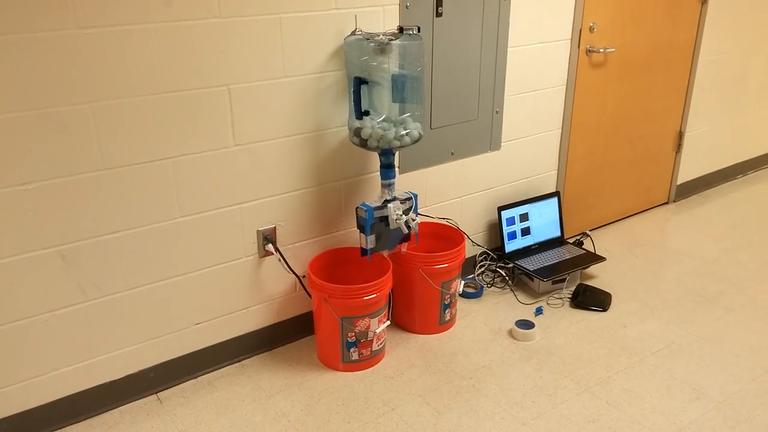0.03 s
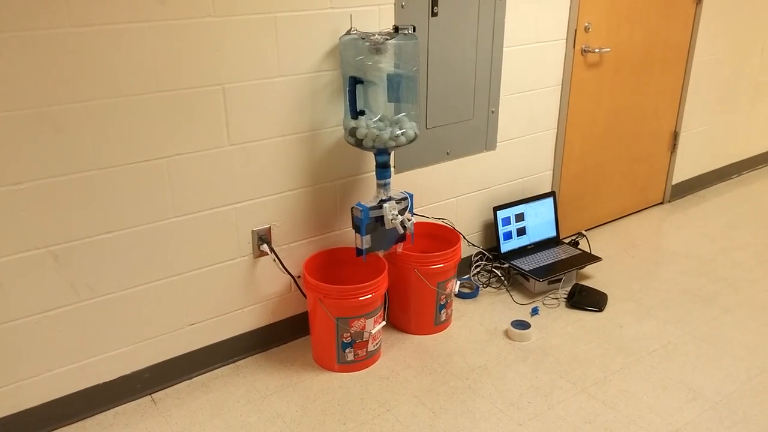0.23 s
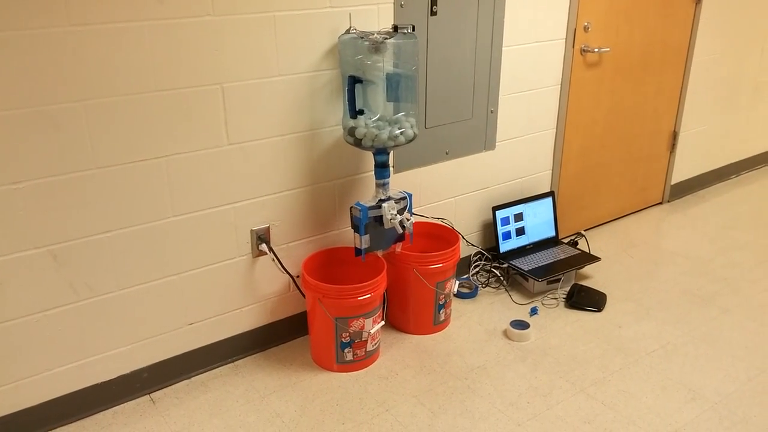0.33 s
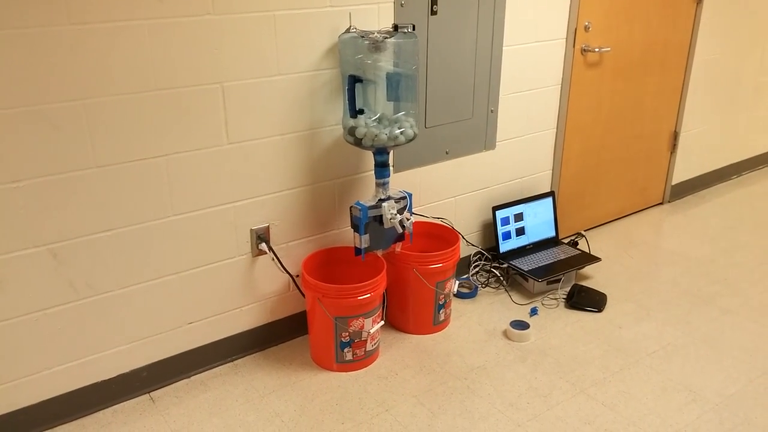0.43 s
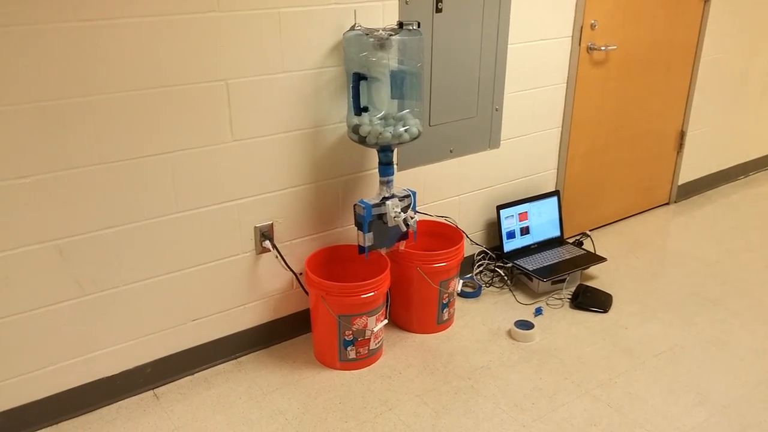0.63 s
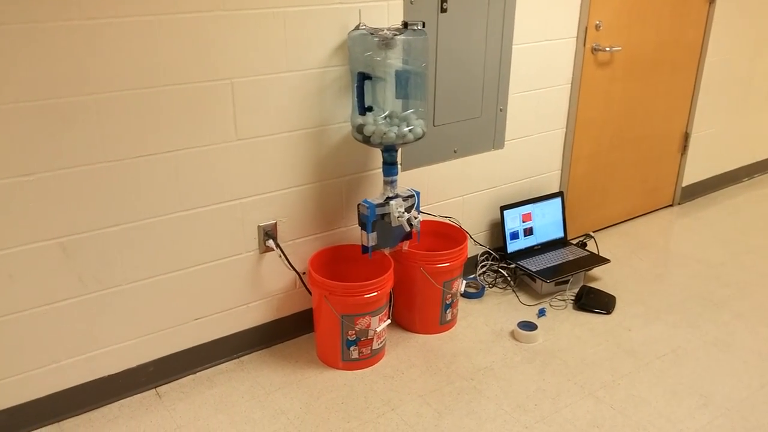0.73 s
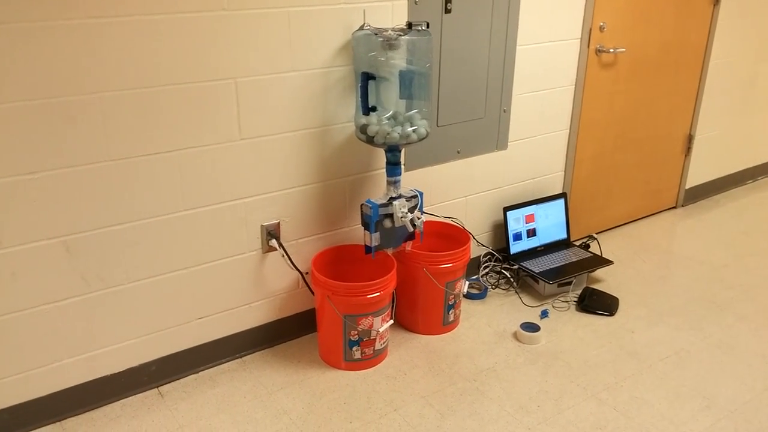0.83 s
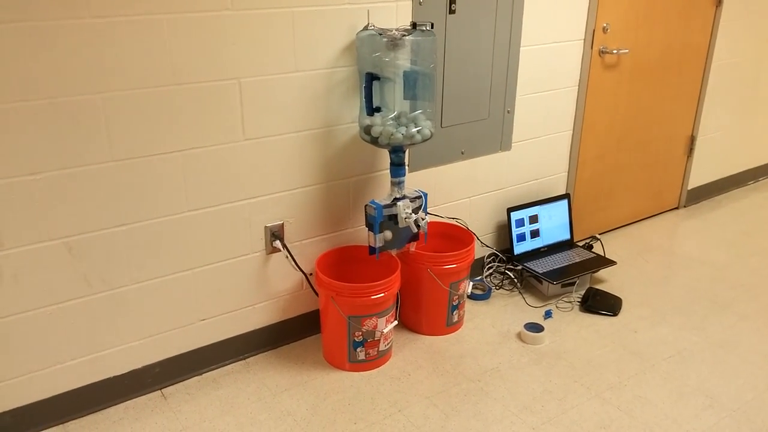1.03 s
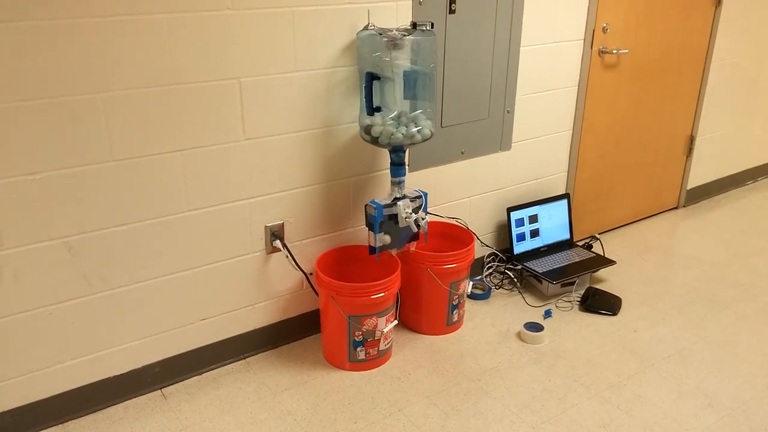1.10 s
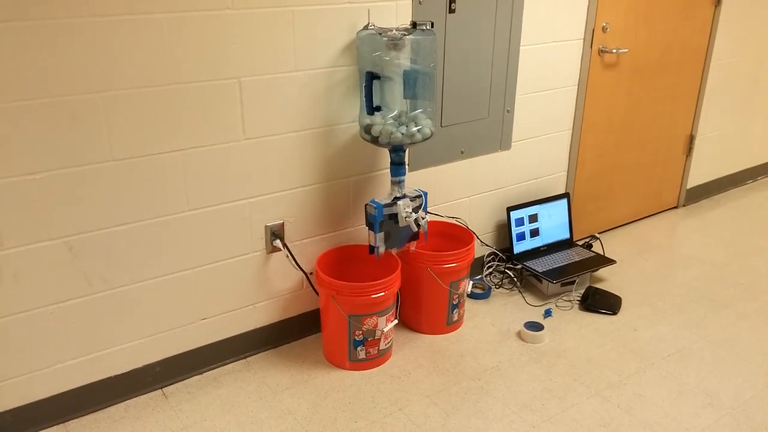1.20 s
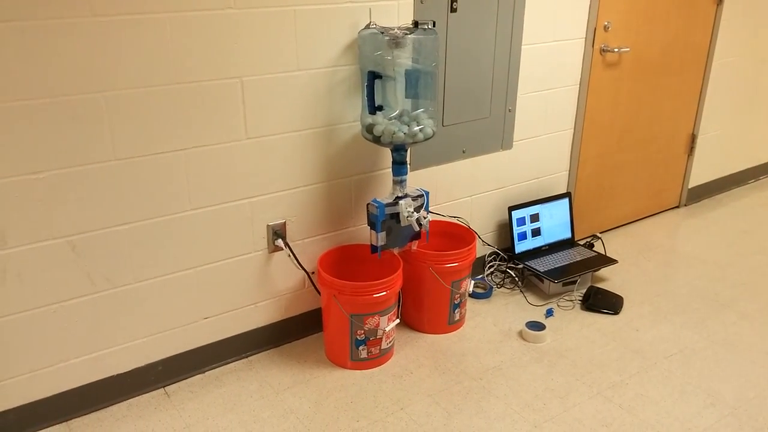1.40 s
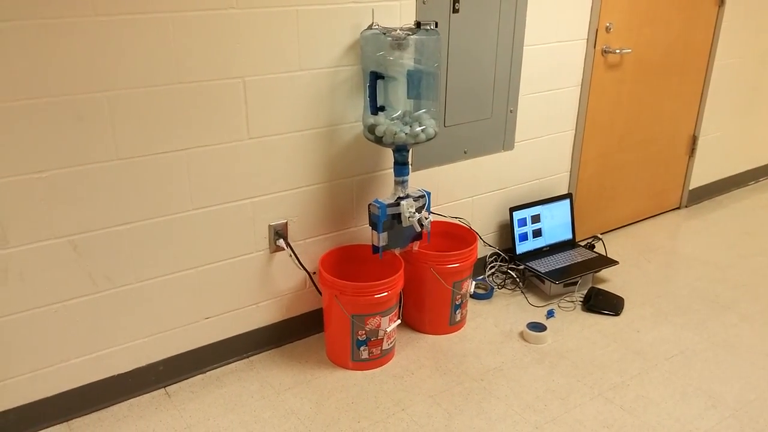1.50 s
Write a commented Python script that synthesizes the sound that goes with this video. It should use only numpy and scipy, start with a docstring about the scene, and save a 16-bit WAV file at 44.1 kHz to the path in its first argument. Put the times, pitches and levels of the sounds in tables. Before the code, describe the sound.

A ball knocks into a plastic bucket and rattles around, over low room noise.

```python
"""Low room noise, rumble and a thin hiss fill a hard-walled corridor. Soft bumps set the air in a
plastic bucket booming, with a brief scuff. A ball drops in with a sharp knock and makes the bucket
ring with uneven, fading bounces. Rubbing gives a short falling squeak, and a few weaker knocks,
bumps and scuffs follow. The background sinks away, then the room noise returns with a last bump."""
import sys
import numpy as np
from scipy import signal
from scipy.fft import rfft, irfft, next_fast_len
from scipy.io import wavfile
from scipy.ndimage import map_coordinates

SR = 44100
rng = np.random.default_rng(int(sys.argv[2]) if len(sys.argv) > 2 else 0)


def waveform_to_disk(signal):
    """Save audio, clipped to [-1, 1], as 16-bit WAV at the path in sys.argv[1]."""
    frames = np.transpose(np.atleast_2d(signal))
    scaled = np.clip(frames, -1, 1) * 32767
    samples = np.round(scaled).astype(np.int16)
    wavfile.write(sys.argv[1], SR, samples)


N = 68355

# how alike left and right sound: frequency_hz, likeness (1 = the same)
STEREO_LIKENESS = [(100, .955), (260, .94), (500, .8), (1000, .33), (2000, .35), (4000, 0), (15000, 0)]
# tone colour of rubbing: frequency_hz, level_db
RUB_SPECTRUM = [(300, -30), (700, 1), (950, 7), (1300, -2.5), (1800, -3.5), (2300, -9.5), (2800, -10),
                (3500, -15), (4250, -6), (5000, -14), (7000, -14.5), (11000, -14.5), (16000, -31)]


def amp(db):
    """Turn decibels into a number to multiply by."""
    return 10 ** (np.asarray(db) / 20)


def unit(x):
    """Scale a sound to an average (rms) level of 1."""
    return x / np.sqrt(np.mean(x ** 2) + 1e-20)


def along(points, hz):
    """Read a table of (frequency_hz, value) between its rows, on a log frequency scale."""
    frequencies, values = np.transpose(points)
    return np.interp(np.log(hz + 1), np.log(frequencies + 1), values)


def curves(rows):
    """Join the rows of a timed table with straight lines: one curve for each column after the time."""
    times, *columns = np.transpose(rows)
    return [np.interp(np.arange(N) / SR, times, column) for column in columns]


def since(start_s):
    """Seconds after a moment, zero before it."""
    return np.maximum(np.arange(N) / SR - start_s, 0)


def strike(t, rise_s, fade_s):
    """The loudness of a hit: a quick rise, and a fall of 60 dB every fade_s."""
    return (1 - np.exp(-t / rise_s)) * np.exp(-np.log(1000) * t / fade_s)


def filtered(x, response):
    """Turn each frequency up or down by response(hz)."""
    size = next_fast_len(N + SR // 10, True)
    return irfft(rfft(x, size) * response(np.fft.rfftfreq(size, 1 / SR)), size)[..., :N]


def stereo_angle(hz):
    """An angle that grows as left and right become less alike."""
    return np.arccos(np.clip(along(STEREO_LIKENESS, hz), -1, 1)) / 2


def noise(spectrum=None):
    """Stereo noise of level 1 with a given tone colour, alike on both sides in the bass."""
    def response(hz):
        angle = stereo_angle(hz)
        colour = amp(along(spectrum, hz)) if spectrum else 1
        return np.array([np.cos(angle), np.sin(angle)]) * colour
    mid, side = filtered(rng.standard_normal((2, N)), response)
    return unit(np.array([mid + side, mid - side]))


def ring(tones, t, rise_s):
    """A struck thing's fading tones, new at every hit; high ones reach left and right out of step."""
    out = np.zeros((2, N))
    t = t[t > 0]
    for pitch_hz, level_db, fade_s in tones:
        phase = 2 * np.pi * (pitch_hz * t + rng.random())
        skew = rng.choice([-1, 1]) * stereo_angle(pitch_hz)
        gain = amp(level_db + rng.normal())  # varies by about 1 dB
        out[:, N - len(t):] += gain * strike(t, rise_s, fade_s) * np.sin([phase + skew, phase - skew])
    return out


def echo(x):
    """The corridor's walls throw a sound back, each frequency dying away at its own speed."""
    # how long the echo lasts: frequency_hz, fade_s (raised to at least 0.01 below)
    fade_times = [(100, .8), (260, 1), (700, 0.49), (1800, 0.48), (5000, 1), (13000, -0.8)]
    # tone colour of the echo: frequency_hz, level_db
    colour = [(100, -2), (260, -5.5), (600, -2), (1000, -2), (2000, -4), (5000, -6), (12000, -7)]
    hz, t, bands = signal.stft(noise(), SR, nperseg=256)
    fade_s = np.maximum(along(fade_times, hz), .01)[:, None]
    same_energy = np.sqrt(2 * np.log(1000) / (fade_s * SR))  # for long and short fades alike
    gain = amp(along(colour, hz))[:, None] * same_energy
    fading = bands * gain * strike(t, rise_s=0.004, fade_s=fade_s)
    tail = signal.istft(fading, SR, nperseg=256)[1][:, :SR]
    return signal.fftconvolve(x, tail, axes=1)[:, :N]


def background():
    """Room noise, building rumble and a thin hiss, each swelling and sinking on its own."""
    # tone colour of each noise: frequency_hz, level_db
    room_spectrum = [(20, -43), (75, -29), (120, -33), (185, 3), (350, -3), (600, -5), (950, 0.5),
                     (1300, -10.5), (2000, -12.5), (3200, -33.5), (5000, -42.5), (16000, -31)]
    rumble_spectrum = [(20, -41), (45, -14.5), (62, -10), (77, 5.5), (90, -9.5), (120, -6.5), (250, -21.5),
                       (1000, -70)]
    hiss_spectrum = [(2000, 5.5), (5000, 2), (7000, 5.5), (9300, 10.5), (12000, 6), (15500, 0.5)]
    # loudness of each noise: time_s, level_db
    room_level = [(0, -38.5), (.2, -38), (.45, -29.5), (.8, -33), (1, -39), (1.12, -42.5), (1.33, -43),
                  (1.43, -48), (1.48, -51.5), (1.51, -38.5), (1.55, -34.5)]
    rumble_level = [(0, -63), (.13, -55.5), (.3, -46), (.6, -45), (.92, -45.5), (1.05, -56), (1.2, -42),
                    (1.33, -51), (1.47, -55), (1.53, -40)]
    hiss_level = [(0, -46), (.12, -46), (.23, -45.5), (.4, -42.5), (.55, -43), (.75, -45), (.87, -47.5),
                  (1.02, -45), (1.13, -48.5), (1.25, -52.5), (1.39, -56.5), (1.48, -65), (1.495, -57.5),
                  (1.55, -71)]
    layers = [(room_level, room_spectrum), (rumble_level, rumble_spectrum), (hiss_level, hiss_spectrum)]
    return sum(amp(curves(level)[0]) * noise(spectrum) for level, spectrum in layers)


def bumps():
    """Each soft bump makes a dull tap, then the air in the bucket swells into a boom."""
    # soft bumps on the bucket: start_s, tap_db, boom_db
    hits = [(0.037, -27.5, -29.5), (.084, -31.5, -32.5), (0.129, -28.5, -34), (0.668, -35, -27),
            (.728, -25, -34.5), (.832, -47, -27.5), (1.173, -23, -22), (1.488, -28.5, -25)]
    # tone colour of a tap: frequency_hz, level_db
    tap_spectrum = [(60, -20), (300, 4), (600, 6), (950, 10), (1300, -2), (1900, -1.5), (3000, -17.5),
                    (5500, -23), (10000, -29.5), (16000, -41)]
    # tones of the air in the bucket: pitch_hz, level_db, fade_s
    air_tones = [(172.4, -2, 0.21), (188, 0.5, 0.22)]
    boom_delay_s = 0.01312
    out, tap = np.zeros((2, N)), noise(tap_spectrum)
    for start_s, tap_db, boom_db in hits:
        out += amp(tap_db) * tap * strike(since(start_s), rise_s=0.003, fade_s=0.15)
        out += amp(boom_db) * ring(air_tones, since(start_s + boom_delay_s), rise_s=0.006)
    return out + echo(out)


def scuffs():
    """Brief rubs make short swells of noise with no tone."""
    # the rubs: peak_s, half_length_s, level_db
    rubs = [(0.122, 0.021, -40), (1.227, 0.041, -37), (1.54, 0.025, -46)]
    swells = sum(amp(level_db) * np.exp(-((since(0) - peak_s) / half_length_s) ** 2)
                 for peak_s, half_length_s, level_db in rubs)
    out = noise(RUB_SPECTRUM) * swells
    return out + echo(out)


def knocks():
    """The ball hits the bucket: the contact snaps, the walls clatter, crack and ring, the bottom thuds."""
    # the ball's hits: start_s, clatter_db, ring_db, thud_db, snap_db, crack_db,
    # wall_rise_s, clatter_fade_s, left_over_right_db
    hits = [(0.2442, -13, -13, -25.5, -4.5, -22, 0.00092, 0.27, 0),
            (0.349, -23, -30.5, -42, -24.5, -54, .002, 0.1, 0),
            (.376, -17.5, -37, -25, -40, -55, 0.0016, 0.022, 0),
            (.432, -23.5, -43, -25, -46, -37, 0.0065, 0.18, -2.5),
            (0.4708, -15.5, -25.5, -11.5, -25, -36.5, 0.0044, 0.054, 0),
            (.527, -23, -34, -20, -22, -64, 0.0016, 0.039, 0.5),
            (0.599, -29.5, -64, -26, -40, -38.5, 0.0037, 0.24, -1.5),
            (.637, -16, -32.5, -28.5, -17.5, -21, 0.0077, 0.21, 1),
            (.768, -28.5, -37, -40, -38, -58, 0.0015, 0.1, 3),
            (1.02, -30.5, -60, -34.5, -32.5, -57, 0.0045, 0.18, 5.5),
            (1.228, -24.5, -39.5, -27, -65, -42, 0.0036, 0.11, 0),
            (1.3, -35.5, -50, -61, -56, -42.5, 0.0057, .15, -1)]
    # tone colours of the dense clatter, bright crack and hard snap: frequency_hz, level_db
    clatter_spectrum = [(30, -47), (120, -4), (250, -15), (450, -3), (650, 1), (950, 2), (1400, 0.5),
                        (2200, -3), (3000, -14), (4500, -22.5), (8000, -26), (16000, -24)]
    crack_spectrum = [(300, -32), (1200, 16.5), (2200, -1.5), (3500, 8.5), (5500, -8.5), (7500, -11),
                      (9500, 7.5), (13000, 0), (16000, -11)]
    snap_spectrum = [(300, -38), (900, 3.5), (1400, 7), (1750, 7.5), (2200, -2), (2800, -13), (4000, -23),
                     (5500, -21), (8000, -46), (16000, -40)]
    # long tones of the whole bucket and short, hollow ones of its bottom: pitch_hz, level_db, fade_s
    bucket_tones = [(216.7, -2, 0.31), (263.4, 1, 0.33), (315.2, -5.5, 0.44), (357, -13, 0.98),
                    (573.5, -14, 0.8), (722, -22.5, 0.63), (956, -7.5, 0.32), (992, -4.5, 0.41),
                    (1248.4, -17, 1), (1324, -22.5, 1), (1423, -4.5, 0.24), (1529, -15, 0.94),
                    (1818, -11.5, 0.28), (2200, -8, 0.24)]
    bottom_tones = [(301, 2.5, 0.05), (724, -6, .04), (887, 1.5, 0.074), (965, -4, 0.15), (1444, 0, 0.035),
                    (1808, 0.5, 0.03), (2190, -23, 0.01)]
    out = np.zeros((2, N))
    clatter, crack, contact = noise(clatter_spectrum), noise(crack_spectrum), noise(snap_spectrum)
    for start_s, clatter_db, ring_db, thud_db, snap_db, crack_db, rise_s, fade_s, pan_db in hits:
        t = since(start_s)
        walls = amp(clatter_db) * clatter * strike(t, rise_s, fade_s)
        walls += amp(crack_db) * crack * strike(t, rise_s, fade_s=0.23)
        snap = amp(snap_db) * contact * strike(t, rise_s=0.00048, fade_s=0.04)
        ringing = amp(ring_db) * ring(bucket_tones, t, rise_s=0.0016)
        thud = amp(thud_db) * ring(bottom_tones, t, rise_s=0.0014)
        pan = amp([[pan_db / 2], [-pan_db / 2]])
        out += pan * (walls + snap + ringing + thud)
        out += echo(walls + amp(-1.5) * snap + amp(-7) * ringing + amp(-10) * thud)
    return out


def squeak():
    """Something rubs briefly: a shaky tone slides down over rubbing noise."""
    # course of the squeak: time_s, pitch_hz, tone_db, rub_db
    slide = [(.87, 930, -32, -75), (.881, 965, -22, -30), (.889, 979, -34, -38), (.902, 918, -26, -31),
             (.93, 814, -30.5, -31.5), (.955, 642, -30.5, -29), (.98, 610, -48, -37),
             (1.06, 631, -44.5, -45)]
    wobble_share, wobbles_per_s = 0.0725, 400
    pitch_hz, tone_db, rub_db = curves(slide)
    wobble = map_coordinates(rng.standard_normal(N // 10), [np.arange(N) * wobbles_per_s / SR])
    shaky_hz = pitch_hz * (1 + wobble_share * wobble)
    tone = unit(np.sin(2 * np.pi * np.cumsum(shaky_hz) / SR))
    sounding = (since(slide[0][0]) > 0) & (since(slide[-1][0]) == 0)
    lean_left = amp([[1.5], [-1.5]])
    out = sounding * (amp(tone_db) * tone * lean_left + amp(rub_db) * noise(RUB_SPECTRUM))
    return out + echo(out)


def scene():
    """Everything heard in the corridor; the level dips briefly before the last bump."""
    # loudness of the whole sound: time_s, gain_db
    dip = [(1.39, -1), (1.428, -3), (1.478, -4.5), (1.49, -0.5)]
    return amp(curves(dip)[0]) * (knocks() + bumps() + squeak() + scuffs() + background())


def record(dry):
    """Each microphone's opening colours the treble; peaks are rounded and the very top is cut off."""
    # tone colour of each microphone: frequency_hz, gain_db
    left_mic = [(2000, 2.5), (2900, 5), (4500, -2), (8300, 1), (9500, 2), (10000, -1), (11200, 3),
                (12500, 8.5), (15500, 5)]
    right_mic = [(2000, 2.5), (2900, 2), (4500, -2), (8300, 1), (9450, 8.5), (9950, 0), (10600, 8.5),
                 (12000, 2), (13500, -1), (15500, -12)]
    ceiling, top_hz = .85, 15900
    coloured = filtered(dry, lambda hz: amp([along(left_mic, hz), along(right_mic, hz)]))
    rounded = coloured / (1 + np.abs(coloured / ceiling) ** 6) ** (1 / 6)
    return filtered(rounded, lambda hz: hz < top_hz)


dry = scene()
out = record(dry)
waveform_to_disk(out)
```